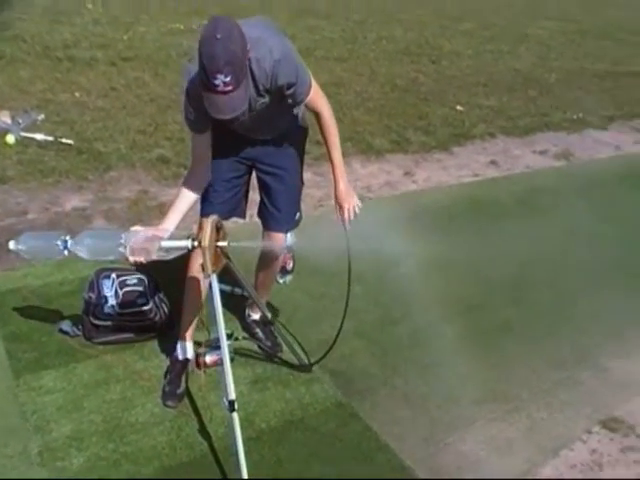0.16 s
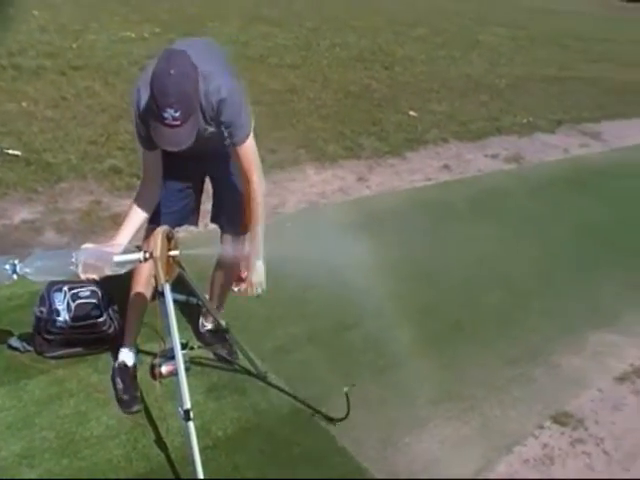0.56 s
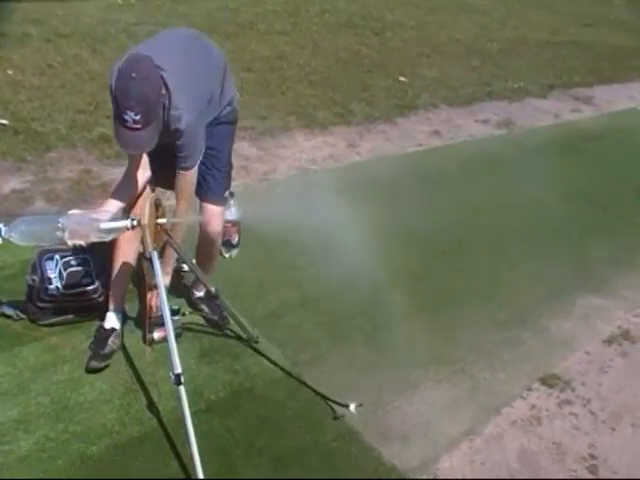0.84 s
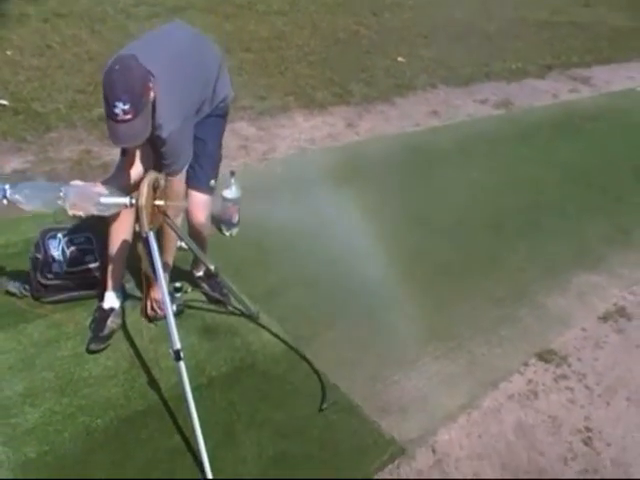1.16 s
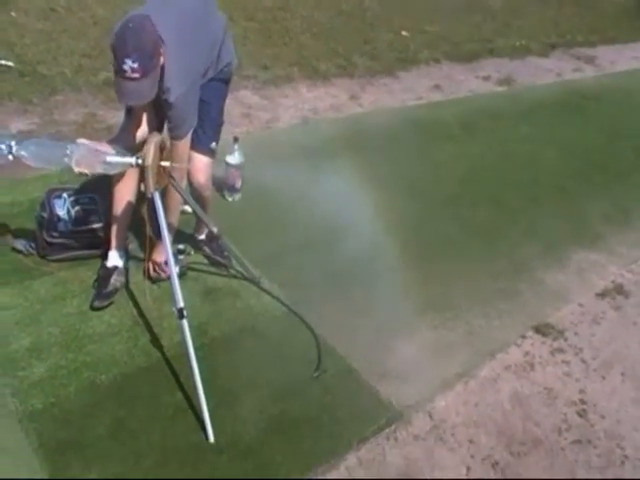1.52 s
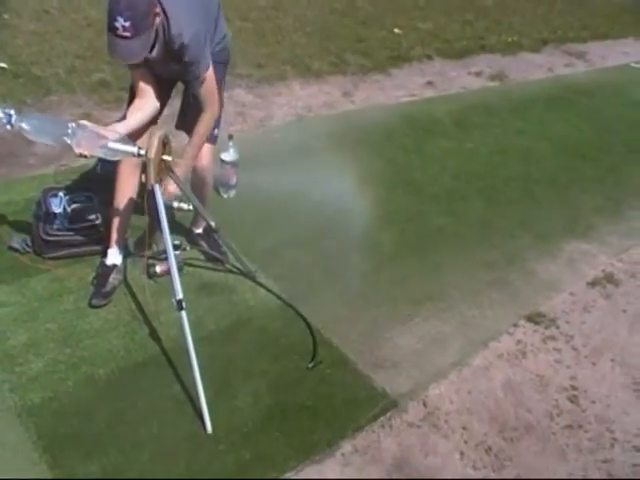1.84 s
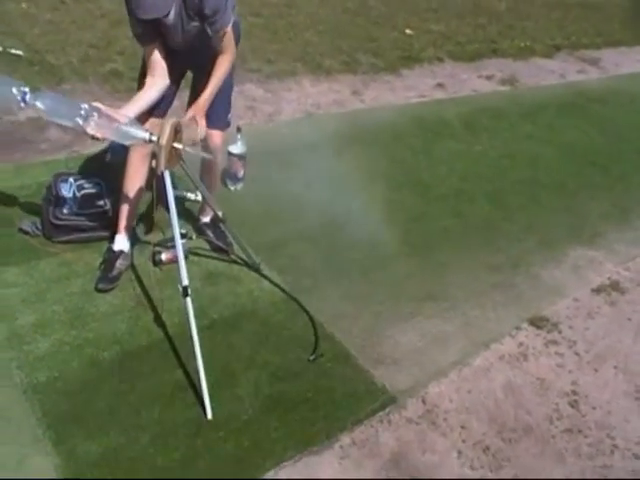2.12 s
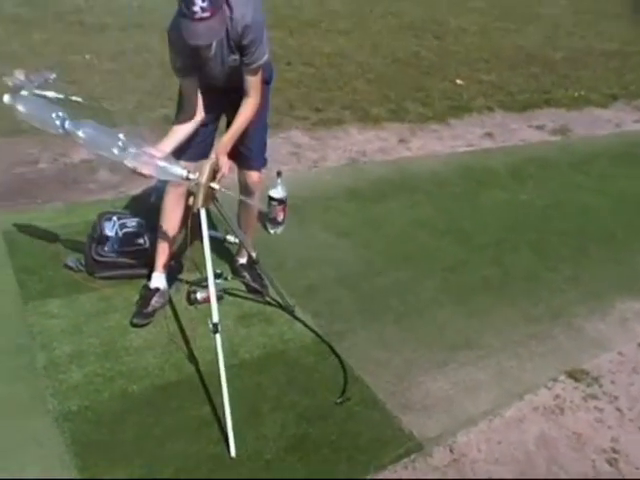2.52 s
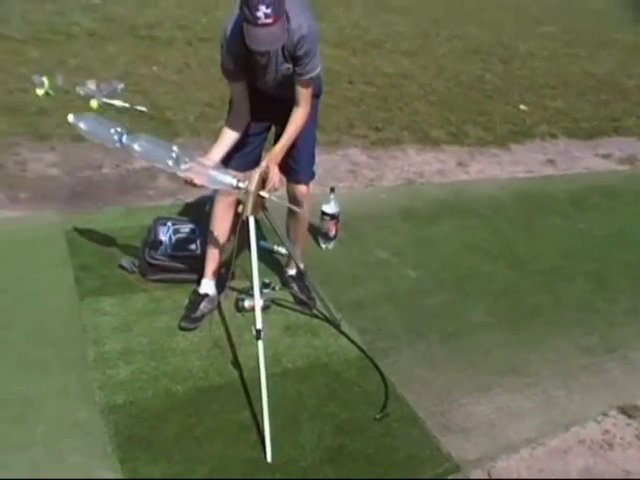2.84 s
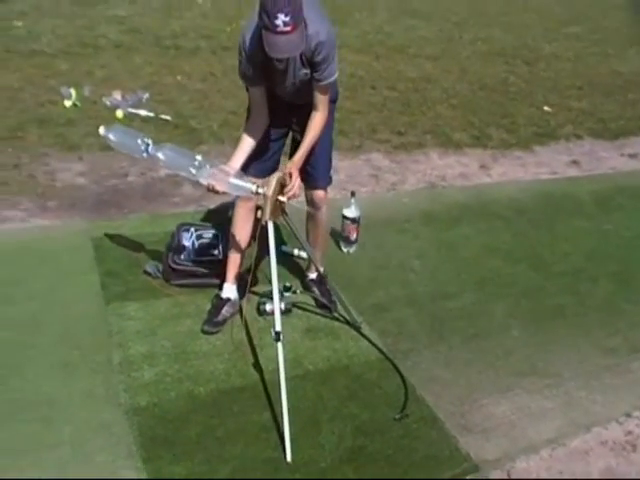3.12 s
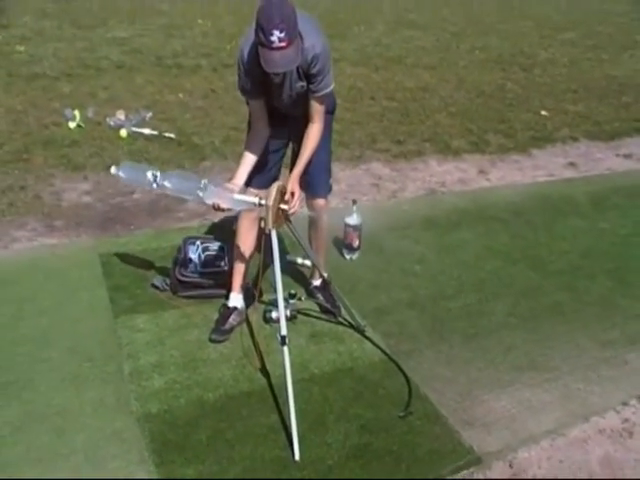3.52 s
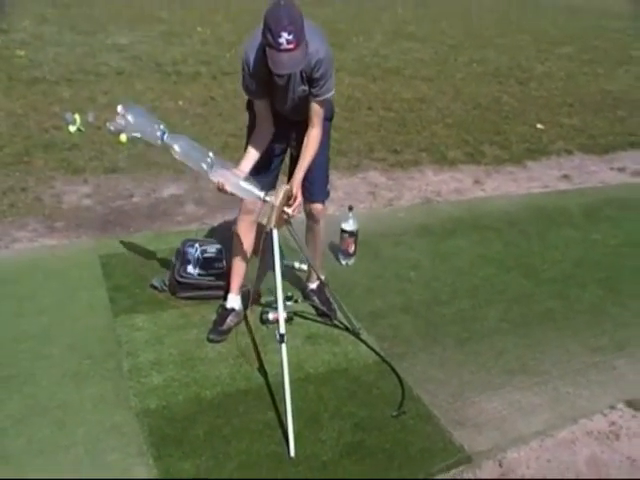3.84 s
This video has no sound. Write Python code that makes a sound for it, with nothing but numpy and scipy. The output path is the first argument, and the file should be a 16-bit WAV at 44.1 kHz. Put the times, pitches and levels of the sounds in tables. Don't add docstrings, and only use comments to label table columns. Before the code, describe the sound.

Pressurised bottle jet hisses loudly with wet spray, then sputters weaker as wind rumble buffets the microphone

```python
import sys
import numpy as np
from scipy import signal
from scipy.fft import rfft, irfft, next_fast_len
from scipy.io import wavfile
from scipy.ndimage import uniform_filter1d, map_coordinates

SR = 44100
rng = np.random.default_rng(int(sys.argv[2]) if len(sys.argv) > 2 else 0)


def output_pcm(signal):
    pcm = np.clip(np.atleast_2d(signal).T, -1, 1) * 32767
    wavfile.write(sys.argv[1], SR, np.round(pcm).astype(np.int16))


def level_to_linear(level):
    exponent = np.asarray(level, float) / 20
    return 10 ** exponent


N = 175077

# time in seconds, level in dB.
JET_LEVEL = [(0, -15), (.13, -22.5), (.32, -16.5), (.5, -19), (.8, -19), (1.3, -19), (1.55, -21),
             (1.75, -19.5), (1.9, -22), (2.17, -20), (2.25, -24.5), (2.4, -24.5), (2.8, -26), (3.05, -27),
             (3.3, -27), (3.52, -23.5), (3.75, -24), (3.95, -23)]
# centre in seconds, depth in dB, length in ms.
CHOKES = [(0.099, -4, 7), (0.136, 0, 28.0), (0.595, 8, 3.4), (0.621, 5, 7.4), (1.56, 2, 28),
          (1.794, 1.5, 28), (1.911, 2, 6.1), (2.08, 3, 33), (2.226, 4, 68), (2.276, 7, 14),
          (2.45, 18, 28.4), (2.495, 10.5, 18), (2.548, 6.5, 14), (2.601, 3.5, 21), (2.66, 6.5, 16),
          (2.76, 19, 3.6), (2.791, 10, 4.5), (2.907, 5.5, 19), (2.933, 8, 11), (2.96, 5.5, 18),
          (2.989, 20, 7.3), (3.021, 7, 16), (3.044, 10, 9.8), (3.08, 10, 22), (3.135, 12, 17),
          (3.205, 3, 8.4), (3.234, 10, 6.2), (3.294, 9, 5), (3.361, 2, 15), (3.746, 6, 9.5)]
# rate in knots per second, depth in dB.
FLUTTER = [(30, .5), (55, 1), (90, .9)]
# time in seconds, level in dB.
WETNESS = [
    (0, -1),
    (1.3, -3),
    (2.1, -11),
    (3.0, -11),
    (3.5, -15),
    (3.95, -7),
]
# time in seconds, delay in ms.
MIRROR_DELAY = [(.1, 2.12), (.4, 2.112), (.7, 2.088), (1.0, 2.04), (1.4, 1.955), (1.7, 1.92), (2.2, 1.9),
                (2.9, 1.878), (3.2, 1.9), (3.5, 1.865), (3.9, 1.84)]
# frequency in Hz, share returned as a ratio.
MIRROR_GAIN = [(300, .92), (3000, .95), (3800, .6), (5000, .55), (6200, .8), (10000, .6)]
# frequency in Hz, phase in radians.
GRASS_LAG = [(700, .2), (1250, .55), (1800, 0)]
# frequency in Hz, density in dB per Hz.
AIR_COLOUR = [(120, -53), (400, -9.5), (1500, 1), (4000, 2.5), (6300, -1), (8500, 2), (10300, -8.5),
              (12500, -48)]
# frequency in Hz, density in dB per Hz.
SPRAY_COLOUR = [(120, -47), (400, -1.5), (1500, -0.5), (4000, 0.5), (6300, 1.5), (8500, 6.5), (10300, -2.5),
                (12500, -19)]
# frequency in Hz, left over right in dB.
PORT_SHADE = [(300, -5), (1200, -1.5), (2100, 2), (3800, -0.5), (5500, -6), (6600, 3), (8300, 8),
              (11000, 8)]
# frequency in Hz, left lead in radians.
PORT_LEAD = [(500, 0.11), (1900, 0.56), (3400, 0.033), (4200, 0.38), (5600, 1.38), (6800, 2.24),
             (8700, 1.64), (10400, 0.064)]
# time in seconds, strength in dB, left over right in dB, tearing edge over strength in dB.
GUSTS = [(1.98, -29, 1, -11.5), (2.13, -23.5, 14, -10.5), (2.3, -33, 9, -8), (2.45, -25, 14, -9.5),
         (2.56, -20, 6, -8.5), (2.64, -18.5, 7, -7), (2.74, -23.5, 10, -7), (2.87, -18, 11.5, -4.5),
         (3.0, -22, 14, -6), (3.15, -18.5, 9, -9.5), (3.3, -20.5, 8, -4), (3.42, -18.5, 4, -9),
         (3.55, -19.5, 11.5, -13), (3.68, -23, 8, -8), (3.79, -18, 3.5, -11), (3.86, -28, 12, -10),
         (3.91, -16, -4, -15.5), (3.97, -20.5, 6, 2.5)]
# frequency in Hz, density in dB per Hz.
BUFFET_LEFT = [(20, -6), (50, -1), (112, 2), (200, -1.5), (300, -8), (500, -20.5), (1000, -59)]
# frequency in Hz, density in dB per Hz.
BUFFET_RIGHT = [(20, -3), (50, -1), (112, -2.5), (200, -4), (300, -12.5), (500, -31), (1000, -49.5)]
# frequency in Hz, density in dB per Hz.
EDGE_COLOUR = [(100, -9), (250, 1.5), (400, 0.5), (700, -5), (1300, -12), (1750, -19.5), (2300, -56)]
# centre in seconds, peak in dB, left over right in dB, pitch in Hz.
PUFFS = [
    (.03, -47, 0, 60),
    (.2, -39, 3.5, 51),
    (.38, -33, 6, 52),
    (1.03, -34, 10, 50),
    (1.17, -23.5, -16, 90),
    (1.22, -33, 10, 50),
    (1.52, -48, -2, 50),
    (1.7, -30, 5, 60),
    (1.795, -24, -7, 88.5),
    (1.839, -23, 24, 119),
]
# centre in seconds, signed pressure in full-scale units.
EDDIES = [(2.608, .44), (2.6191, -.43), (2.6431, -.38), (2.6764, -.39), (2.7703, -.42), (2.8385, .46),
          (2.8638, .48), (2.8873, -.8), (3.0064, .4), (3.093, .4), (3.1225, .6), (3.1539, -.45),
          (3.216, .41), (3.2532, .36), (3.2685, .8), (3.2891, .45), (3.3106, .55), (3.3278, -.46),
          (3.3669, -.46), (3.3987, .42), (3.4083, -.46), (3.42, .54), (3.4391, -.41), (3.5759, .35),
          (3.66, .35), (3.7937, .45), (3.9257, .45), (3.9489, -.52)]
# multiple of the stroke rate as a number, level in dB.
PUMP_ORDERS = [(1, -33), (2, -10.5), (3, -11.5), (4, -9.5), (5, -5), (6, -1.5), (7, -5.5), (8, -9),
               (9, -33), (10, -6), (11, -6.5), (12, -9.5), (13, -13.5), (14, -15.5), (15, -9.5), (16, -24),
               (17, -22), (18, -32), (19, -13), (20, -10.5)]
PUMP_DRIFT = {5: -2.5, 7: 4.5, 8: -3, 10: 1.5, 11: -1.5}


def jet():
    (level_db,), (spray_db,) = curves(JET_LEVEL), curves(WETNESS)
    t = np.arange(N) / SR
    for centre_s, depth_db, length_ms in CHOKES:
        age = (t - centre_s) * 1000 / length_ms
        level_db = level_db - depth_db * np.exp(-np.log(16) * age ** 2)
    level_db = level_db + sum(db * wobble(rate) for rate, db in FLUTTER)
    air = at_ports(patchy(patchy_db=1.29), AIR_COLOUR, alike=0.72)
    air = mirrored(air, share=1)
    wet = unit(patchy(patchy_db=-1.7)) + level_to_linear(-6) * droplets()
    spray_gain = level_to_linear(spray_db + 0.083 * wobble(22.6))
    spray = spray_gain * mirrored(at_ports(wet, SPRAY_COLOUR, alike=0.88), share=.35)
    return level_to_linear(level_db - 2.5) * (air + spray)


def droplets():
    drops_per_s, centre_hz, spread, cycles, size_db = 2800, 4000, .6, 1.5, 2.5
    draw = rng.random((2, 12000, 3))[:, :int(drops_per_s * N / SR)]
    hz = centre_hz * np.exp(spread * 3.0 * (draw[..., 1:2] - .5))
    t = np.arange(48) / SR
    size = level_to_linear(-size_db * np.log(1 - draw[..., 2:]))
    burst = size * np.sin(2 * np.pi * hz * t) * np.exp(-t * hz / cycles) * np.sqrt(hz)
    at = (draw[..., :1] * N).astype(int) + np.arange(48)
    streams = [np.bincount(a.ravel(), b.ravel(), N + 48)[:N] for a, b in zip(at, burst)]
    return unit(np.array(streams))


def patchy(patchy_db):
    z = signal.stft(rng.standard_normal((2, N)), nperseg=512)[2]
    field = uniform_filter1d(rng.standard_normal(z.shape[1:]), size=6, axis=0)
    field = uniform_filter1d(field, size=10, axis=1)
    return signal.istft(z * level_to_linear(patchy_db * field / field.std()), nperseg=512)[1][:, :N]


def at_ports(pair, spectrum, alike):
    turn = np.arccos(np.clip(alike, -1, 1)) / 2
    mixed = np.cos(turn) * pair[0] + np.sin(turn) * pair[1] * [[1], [-1]]
    side = np.array([[.5], [-.5]])

    def response(hz):
        gain = level_to_linear(along(spectrum, hz) + side * along(PORT_SHADE, hz))
        return gain * np.exp(1j * side * along(PORT_LEAD, hz))

    out = filtered(mixed, response)
    return out / out.std()


def mirrored(x, share):
    delay_ms, = curves(MIRROR_DELAY)
    soft = filtered(x, lambda hz: share * along(MIRROR_GAIN, hz) * np.exp(-1j * along(GRASS_LAG, hz)))
    late = np.arange(N) - delay_ms * SR / 1000
    return x + np.array([map_coordinates(c, [late], order=5, mode="mirror") for c in soft])


def wind():
    rise_s = 0.026
    calm = (GUSTS[0][0] - rise_s, -39.5, -1.5, -15)
    strength_db, pan_db, edge_db = curves([calm, *GUSTS])
    lumps = level_to_linear([2.5 * wobble(45) + 1 * wobble(9.8) for port in range(2)])

    def buffet(hz):
        return level_to_linear([along(BUFFET_LEFT, hz), along(BUFFET_RIGHT, hz)])

    low = evened(filtered(lumps * rng.standard_normal((2, N)), buffet)) * panned(pan_db)
    torn = lumps * level_to_linear(1.4 * wobble(150)) * rng.standard_normal((2, N))
    edge = evened(filtered(torn, lambda hz: level_to_linear(along(EDGE_COLOUR, hz))))
    push = low + level_to_linear(edge_db + 1.5) * edge * panned(pan_db + 11)
    skew, cut_hz = .07, 28
    push = filtered(push + skew * push ** 2, lambda hz: hz ** 2 / (hz ** 2 + cut_hz ** 2))
    return level_to_linear(strength_db + 3.5) * push


def evened(x):
    samples, evenness = 2400, .8
    power = np.abs(uniform_filter1d(x ** 2, size=samples)) + 1e-9
    return unit(x / power ** (evenness / 2))


def puffs():
    t = np.arange(N) / SR
    cycles = .7
    out = np.zeros((2, N))
    for centre_s, peak_db, pan_db, hz in PUFFS:
        swing = np.cos(2 * np.pi * hz * (t - centre_s) + 0.7)
        envelope = np.exp(-((t - centre_s) * hz / cycles) ** 2)
        out += level_to_linear(peak_db) * panned(pan_db)[:, None] * swing * envelope
    return out


def eddies():
    t = np.arange(N) / SR
    width_ms, rebound = 0.5, 0.24
    left = np.zeros(N)
    for centre_s, pressure in EDDIES:
        u = ((t - centre_s) * 1000 / width_ms) ** 2
        left += pressure * (np.exp(-np.log(16) * u) - rebound * np.exp(-u / 4))
    return level_to_linear(0.5) * left * [[1], [0]]


def pump():
    stroke_hz, level_db, pan_db = 55.05, -38, -2.5
    stop_s, fade_s, waver_db = 1.67, 0.018, 1.5
    t = np.arange(N) / SR
    turn = 2 * np.pi * np.cumsum(stroke_hz * (1 + 0.00253 * wobble(4.15))) / SR
    hum = np.zeros(N)
    for k, db in PUMP_ORDERS:
        drift_db = PUMP_DRIFT.get(k, 0) * (t - stop_s / 2)
        gain = level_to_linear(db + drift_db + waver_db * wobble(8.85))
        hum += gain * np.sin(k * turn + rng.normal(0, 0.9))
    on = np.clip((stop_s - t) / fade_s + .5, 0, 1)
    return np.sqrt(2) * hum * on * level_to_linear(level_db + pan_db * np.array([[.5], [-.5]]))


def panned(pan_db):
    share = np.array([level_to_linear(pan_db / 2), level_to_linear(-pan_db / 2)])
    return share / np.sqrt(np.mean(share ** 2, axis=0))


def unit(x):
    return x / np.sqrt(np.mean(x ** 2, axis=-1, keepdims=True) + 1e-20)


def along(points, hz):
    f, v = np.transpose(points)
    return np.interp(np.log(hz + 1), np.log(f + 1), v)


def curves(rows):
    s, *cols = np.transpose(rows)
    return [np.interp(np.arange(N) / SR, s, c) for c in cols]


def wobble(rate):
    return map_coordinates(rng.standard_normal(N // 200), [np.arange(N) * rate / SR])


def filtered(x, response):
    m = next_fast_len(N + SR // 2)
    return irfft(rfft(x, m) * response(np.fft.rfftfreq(m, 1 / SR)), m)[..., :N]


def scene():
    return jet() + wind() + puffs() + eddies() + pump()


def band_limit(x):
    return signal.sosfilt(signal.butter(12, 13100, fs=SR, output="sos"), x)


def record(dry):
    ceiling, knee = 1.1, 4
    soft = dry / (1 + np.abs(dry / ceiling) ** knee) ** (1 / knee)
    return band_limit(soft)


dry = scene()
out = record(dry)
output_pcm(out)
```